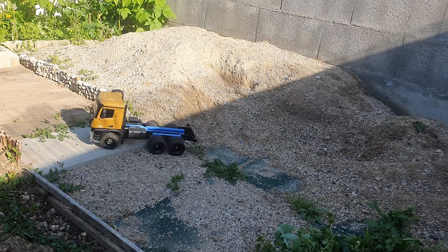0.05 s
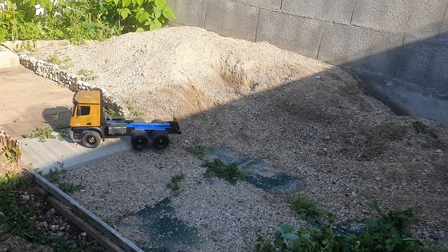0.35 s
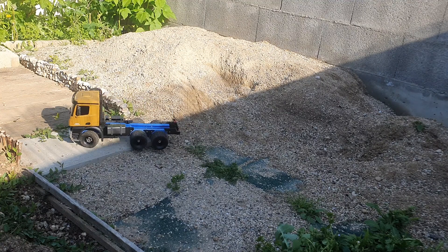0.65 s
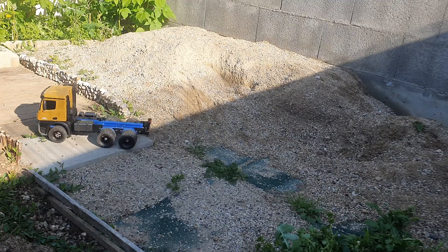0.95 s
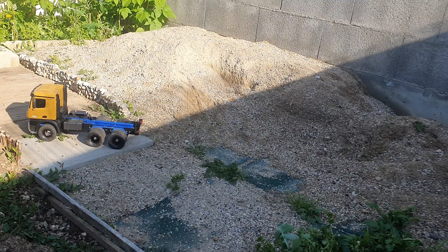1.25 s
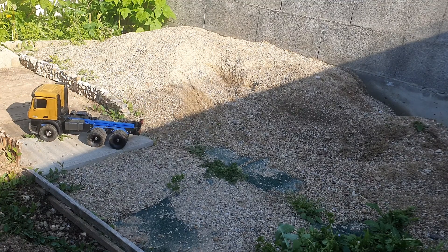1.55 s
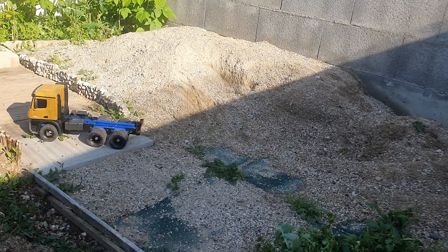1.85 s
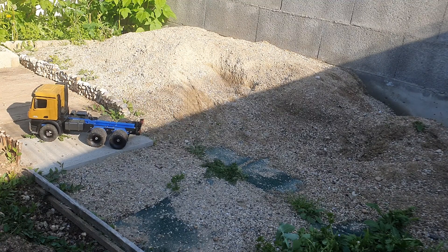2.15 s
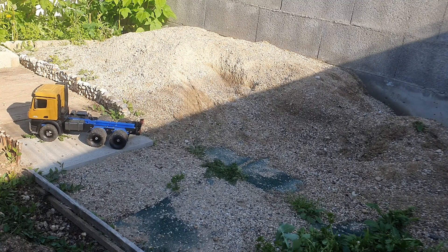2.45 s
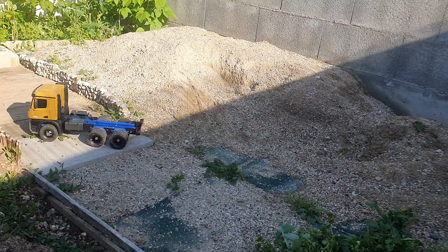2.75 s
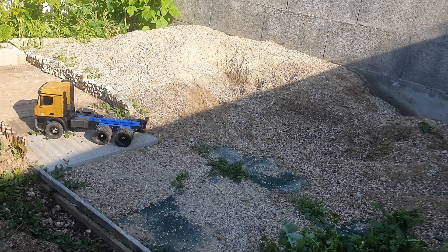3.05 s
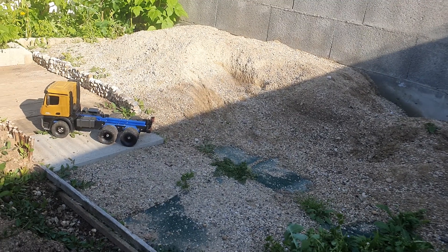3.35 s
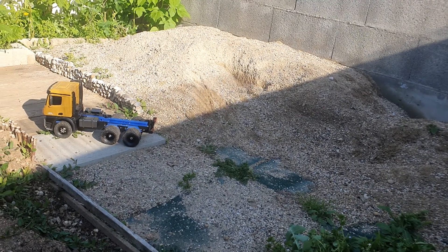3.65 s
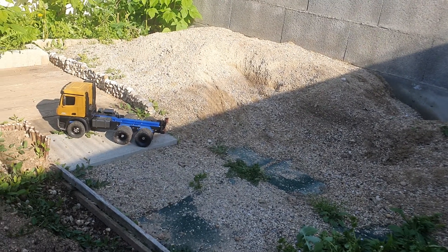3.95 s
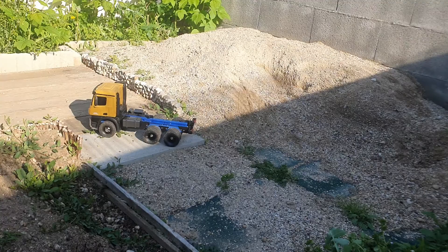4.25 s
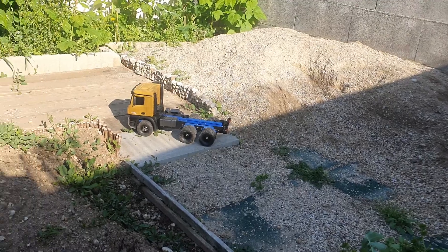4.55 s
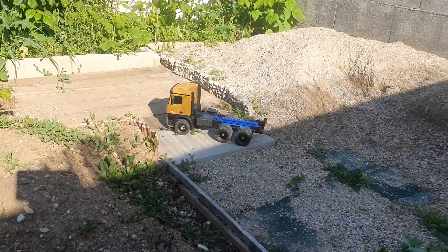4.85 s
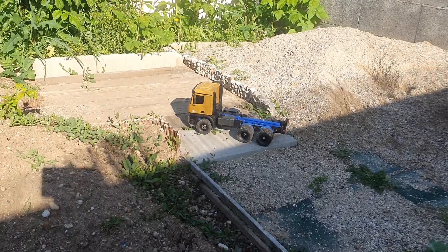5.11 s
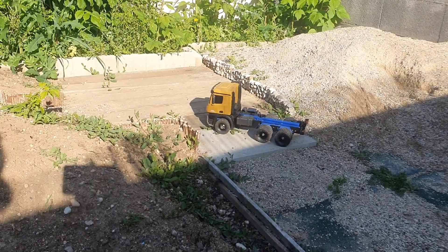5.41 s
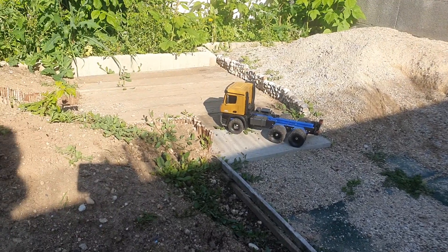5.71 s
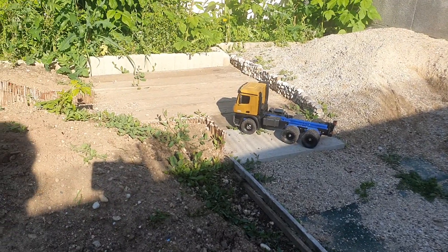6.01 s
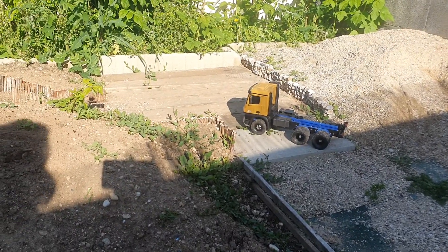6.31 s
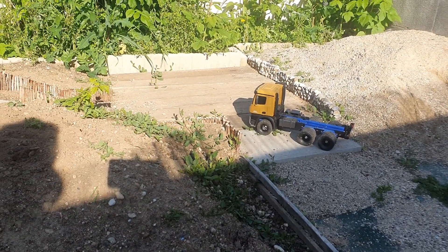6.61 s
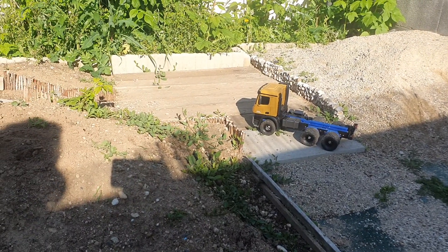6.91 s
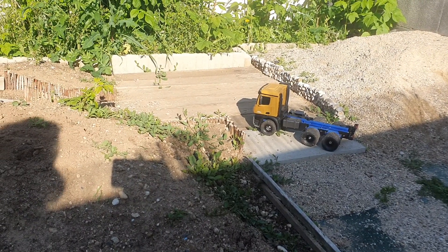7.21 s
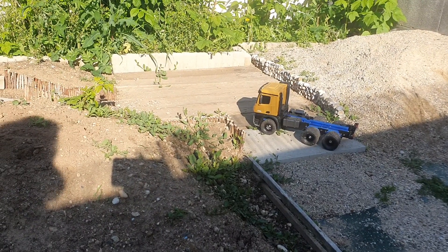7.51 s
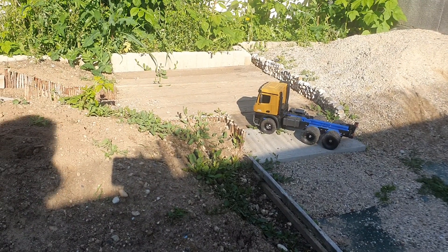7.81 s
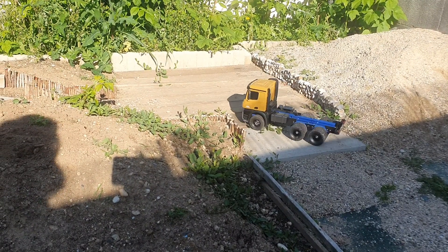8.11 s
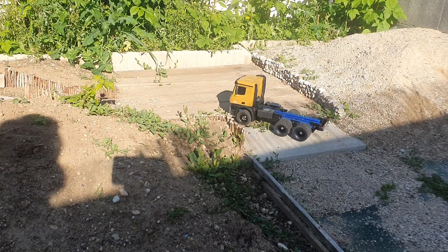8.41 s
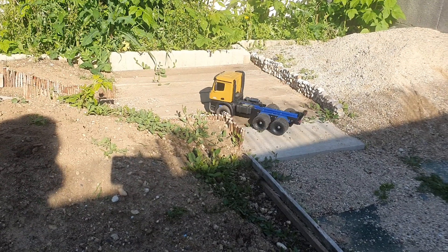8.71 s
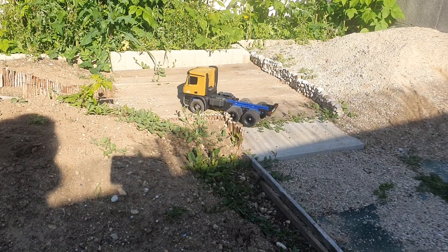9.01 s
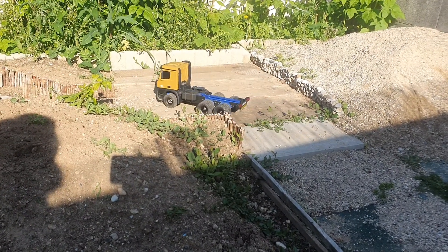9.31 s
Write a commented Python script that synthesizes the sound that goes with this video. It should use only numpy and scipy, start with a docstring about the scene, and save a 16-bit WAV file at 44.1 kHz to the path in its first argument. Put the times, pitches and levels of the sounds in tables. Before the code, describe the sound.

A small remote-controlled truck is already moving at the start, its electric motor and gears whining and its plastic body rattling, with a light knock and a scuff of grit as it slows. A second spurt rises at about 0.5 seconds and winds down by 1.2 seconds. The yard then goes quiet: small birds chirp and twitter some way off from about 1.6 to 7.7 seconds, clearest around 2 and 4 seconds. A light breeze rumbles on the microphone throughout, with soft bumps around 3 seconds. At about 7.8 seconds the truck starts again with a thin, high electronic whistle. Its rasping gear whine climbs, dips briefly, then rises to full speed by 9 seconds and keeps going. A knock and a crunch of grit come at about 9.4 seconds. The sound sits mostly to the left.

```python
"""A radio-controlled model truck whirs over gravel in two short spurts and stops on a path in a walled yard.
Small birds twitter some way off and a light breeze bumps the microphone; then the truck drives off again.
Its speed controller whistles by switching the motor current on and off very fast. Its gears whine
and rattle in a plastic body, following the speed of the motor, and grit scuffs under the tyres."""
import sys
import numpy as np
from scipy import signal
from scipy.fft import rfft, irfft, next_fast_len
from scipy.io import wavfile
from scipy.ndimage import uniform_filter1d

SR = 44100
rng = np.random.default_rng(int(sys.argv[2]) if len(sys.argv) > 2 else 0)


def digitize_waveform(pressure):
    """Quantize a signal to 16-bit integers and store it at the path in sys.argv[1].

    Rows of a 2-D input are taken as channels; values are limited to [-1, 1].
    """
    field = np.atleast_2d(pressure).T
    bounded = np.clip(field, -1, 1)
    quanta = np.round(bounded * 32767).astype(np.int16)
    wavfile.write(sys.argv[1], SR, quanta)


N = 417186
T = np.arange(N) / SR
HZ = np.fft.rfftfreq(N, 1 / SR)

# A "colour" says how strong the low and high parts of a sound are, compared with each other.
# colour of the open air's hiss: (frequency [Hz], level [dB])
AIR_COLOUR = [(88, -31.5), (150, -3), (231, -9), (457, -12), (514, -10), (1140, -15.5), (1560, -19),
              (2220, -29), (2810, -26.5), (3700, -33), (6640, -27.5), (7470, -42), (14000, -41.5),
              (15100, -40), (16000, -28)]
# slow swell of a far-off wash of noise: (time [s], relative level [dB])
WASH_LEVEL = [(1.4, -78), (2.3, -80), (3, -69), (3.7, -66), (3.9, -64.5), (4.1, -90), (5.5, -79),
              (6.5, -84), (7.2, -100)]
# colour of that wash: (frequency [Hz], level [dB])
WASH_COLOUR = [(150, -21), (400, -5), (800, 1), (1500, 1.5), (2000, -21), (4000, -33)]
# a faint high hiss that lingers after the spurts and returns briefly before the last drive:
# (time [s], level [dB])
HIGH_HISS_LEVEL = [(.35, -70), (.95, -65), (2, -68.5), (2.5, -74.5), (3, -79), (7.2, -101), (7.35, -65),
                   (7.6, -77.5)]
# colour of that high hiss: (frequency [Hz], level [dB])
HIGH_HISS_COLOUR = [(800, 5.5), (2200, -3.5), (3700, 9), (6500, 0), (7500, -8), (11000, -12.5),
                    (14000, -24)]
# gusts on the microphone: (middle [s], width [s], level [dB], left minus right [dB])
GUSTS = [(.05, 0.18, -50.5, -1), (0.77, 0.14, -52.5, 4), (1.32, 0.071, -55.5, 11), (1.696, .07, -49, 18.5),
         (2.102, 0.42, -54.5, 3.5), (2.88, 0.053, -45, -6), (3.065, 0.45, -51, 0), (3.24, 0.034, -41, 4),
         (3.584, 0.38, -55, 6.5), (4.358, 0.043, -48.5, 15), (6.82, 0.087, -50, 13.5),
         (7.04, 0.11, -49.5, 3.5), (7.708, 0.071, -52, 12), (7.986, 0.28, -55.5, 13),
         (8.262, 0.12, -47, -9), (9.08, 0.81, -48, -1.5), (9.295, .22, -44, 2)]
# colour of the breeze's rumble: (frequency [Hz], level [dB])
BREEZE_COLOUR = [(10, -69), (25, -7), (38, -4), (50, 3.5), (78, -1), (120, -11.5), (155, -14.5), (200, -31),
                 (300, -29), (600, -74.5)]

# moments when the distant flock gets louder: (middle [s], width [s], level [dB])
FLOCK_BOUTS = [(2.335, 0.12, -77.5), (3.25, 0.34, -80.5), (3.933, 0.21, -67.5), (4.527, 0.23, -78),
               (5.937, 1.5, -78.5), (6.86, 0.18, -79.5)]
# nearer birds: (time [s], length [s], start pitch [Hz], end pitch [Hz], level [dB], roughness [0-1])
CHIRPS = [(2.154, 0.067, 4970, 2860, -57, .4), (3.183, 0.088, 4370, 3420, -63, 0.75),
          (3.865, 0.041, 3600, 3210, -64, 0.22), (3.967, .055, 5090, 3840, -55.5, 0.84),
          (4.047, .02, 3545, 3680, -55, 0.01), (4.099, 0.019, 3645, 3430, -60, .05),
          (4.427, .038, 2006, 3120, -62, 0.52), (4.446, 0.0495, 3670, 3240, -60, 0.29),
          (6.265, 0.051, 4070, 3500, -66, .53), (7.494, 0.096, 3700, 3270, -66, 0.53),
          (7.652, 0.085, 3570, 3090, -65.5, 0.44)]
# one bird's thin, high pips: (time [s], level [dB])
PIPS = [(1.645, -70), (2.09, -74), (2.37, -72.5), (3.09, -72), (4.227, -75), (4.41, -72), (4.797, -74),
        (5.201, -71.5), (5.288, -77), (6.794, -69.5), (7.535, -72.5)]
# hoarse, falling calls farther off: (time [s], start pitch [Hz], level [dB])
HOARSE_CALLS = [(1.861, 3330, -72), (2.66, 4490, -67), (2.8, 4930, -72), (3.41, 4480, -72.5),
                (4.177, 4410, -68), (4.884, 5010, -72.5), (5.227, 3890, -69), (5.6, 3690, -69.5),
                (6.399, 4330, -71), (6.75, 4280, -73)]

# tyres scuffing grit: (time [s], length [s], level [dB])
SCUFFS = [(.213, .02, -49.5), (.245, .03, -50), (.415, .065, -51.5), (.925, .02, -48), (7.3, .06, -62),
          (7.39, .05, -66), (7.45, .05, -66), (8.088, .012, -49), (9.418, .025, -45)]
# colour of the grit: (frequency [Hz], level [dB])
GRIT_COLOUR = [(200, 3.5), (600, 7), (1500, -2), (2400, 10.5), (4000, 12), (7000, 4.5), (10000, -10),
               (15000, -9)]
# the truck's body knocking over bumps: (time [s], level [dB])
KNOCKS = [(.105, -53), (0.221, -61), (8.265, -69), (8.379, -66), (9.425, -47)]
# tones of the knocked body: (pitch [Hz], relative level [dB], time to fade by 60 dB [s])
KNOCK_TONES = [(373, -6, 0.15), (408, 9, 0.1), (510, 9, 0.22), (580, 23, 0.02), (673, 8, 0.16),
               (1840, 14, .04)]
# speed of the motor shaft, one list for each drive: (time [s], speed [turns/s])
SHAFT_SPEED = [
    [(0, 75.3), (.16, 75), (.25, 48), (.32, 9)],
    [(.49, 2), (.54, 20), (.6, 35), (.67, 67), (.82, 83), (.92, 68), (1.03, 33), (1.21, 3)],
    [(7.75, 3), (7.9, 21), (7.99, 39), (8.16, 49), (8.34, 38), (8.6, 61), (8.71, 79), (8.89, 82),
     (8.95, 88), (9.01, 83), (9.22, 92.5), (9.3, 86), (9.46, 87)],
]
# the three drives, with base levels for their sounds: (throttle on [s], throttle off [s], gears [dB],
# body rattle [dB], whistle [dB], whine relative to gears [dB], motor can relative to gears [dB])
DRIVES = [(-.05, 0.092, -40, -43.5, -60, -6, -8), (0.5, .92, -40, -41, -56.5, -10, -13),
          (7.764, 9.6, -42.5, -42.5, -51.5, -7, -5.5)]
# tones from 6 switches of the motor's contacts and 13 gear teeth a turn: (pitch [cycles per turn])
WHINE_MULTIPLES = [6, 12, 18, 24, 26, 39, 48, 52, 65, 78]
# strength of each of those tones: (relative level [dB])
WHINE_LEVELS = [-1, -7, -2, -10, -7, 0, -7, -.5, -7, -3.5]
# how well the housing lets those tones out: (frequency [Hz], gain [dB])
HOUSING_GAIN = [(250, -18), (440, -2), (550, 1), (720, -5), (950, -7), (1130, 2), (1370, 3), (1480, -3),
                (1550, -12), (1650, -14), (1800, -2), (2000, -9), (2280, -1), (2600, -7), (3000, -1),
                (3300, -2), (3600, 1), (3900, -1), (4270, 5), (4600, -4), (4900, -12), (6200, -5),
                (8000, -12)]
# colour of the gearbox: (frequency [Hz], level [dB])
GEARBOX_COLOUR = [(250, -25), (700, -11.5), (1100, -1.5), (1600, -0.5), (2000, -2), (3300, 4.5),
                  (4400, 1.5), (5200, 2.5), (6500, 3), (8200, -4.5), (10200, -1.5), (12000, -10.5),
                  (16000, -13)]
# pitches at which the gearbox rings: (pitch [Hz], width [Hz], boost [dB])
GEARBOX_RINGS = [(1133, 29, 14.4), (1457, 110, 9.6), (1748, 12.5, 16.6), (2360, 16, 11.3), (3036, 19, 11.8),
                 (4540, 84, 1.4), (6180, 150, 5.3)]
# colour of the motor's metal shell, its "can": (frequency [Hz], level [dB])
CAN_COLOUR = [(3000, -24), (3500, 11), (3720, 9), (3900, 28), (4060, -3), (4350, -11), (5000, -67)]
# colour of the rattling body: (frequency [Hz], level [dB])
BODY_COLOUR = [(60, -28), (170, -12), (260, -16), (350, -7.5), (440, 1), (500, -13.5), (570, 2.5),
               (720, -0.5), (860, -10), (1200, -15.5), (3000, -28.5)]

# how much quieter the microphone's shaded right side is: (frequency [Hz], drop [dB])
RIGHT_SHADE = [(60, 2.5), (200, 3), (380, 5.5), (700, 8), (1300, 11), (4400, 11.3), (8000, 12.3),
               (15000, 15)]
# how alike left and right are: (frequency [Hz], likeness [0-1])
LIKENESS = [(60, 0.57), (130, 1), (290, 0.71), (640, 0.57), (1400, 0.14), (3100, 0.32), (7000, 0.055)]

CRUISE_SPEED = 80  # turns of the shaft per second
RASP_DB_PER_DOUBLING, WHINE_DB_PER_DOUBLING, RATTLE_DB_PER_DOUBLING = 7, 3, 6  # as the speed doubles


def amp(db):
    """Turns decibels into a number to multiply by."""
    return 10 ** (np.asarray(db) / 20)


def unit(x):
    """Scales a signal to an average strength (rms) of one."""
    return x / np.sqrt(np.mean(x ** 2) + 1e-20)


def curve(rows):
    """Joins (time, value) points with straight lines, one value for every sample."""
    return np.interp(T, *np.transpose(rows))


def shape(points):
    """Joins (frequency, value) points, one value for every frequency in HZ."""
    hz, value = np.transpose(points)
    return np.interp(np.log(HZ + 1), np.log(hz + 1), value)


def colour(x, db):
    """Turns each frequency up or down, then scales the result to strength one."""
    return unit(irfft(rfft(x) * amp(db), N))


def wander(hz, size=N, stride=16):
    """A smooth random wobble of strength one, with changes up to about the given rate."""
    steps = next_fast_len(size // stride + 2)
    f = np.fft.rfftfreq(steps, stride / SR)
    slow = unit(irfft(rfft(rng.standard_normal(steps)) / (1 + (f / hz) ** 4), steps))
    return np.interp(np.arange(size), np.arange(steps) * stride, slow)


def swell(middle, width):
    """A bell-shaped rise and fall in time."""
    return np.exp(-np.minimum((2 * (T - middle) / width) ** 2 / 2, 50))


def add(mix, s, sound):
    """Mixes a sound in, starting at s seconds."""
    part = mix[max(round(s * SR), 0):][:len(sound)]
    part += sound[:len(part)]


def pair(x):
    """Makes two unrelated channels alike in the bass."""
    a, b = rfft(x)
    same = shape(LIKENESS)
    return irfft(np.array([a, same * a + np.sqrt(1 - same ** 2) * b]), N)


def yard(x, fade_s, echo_db):
    """Adds echoes from ground and walls, different left and right, that fall 60 dB in fade_s."""
    t = np.arange(SR // 2) / SR
    echoes = rng.standard_normal((2, len(t))) * (rng.random((2, len(t))) < 3000 / SR)
    echoes *= amp(-60 * t / fade_s)
    echoes *= amp(echo_db) / np.linalg.norm(echoes, axis=1, keepdims=True)
    echoes[:, 0] += 1  # the direct sound
    return signal.fftconvolve(x[None], echoes, axes=1)[:, :N] / np.sqrt(1 + amp(echo_db) ** 2)


def air(hiss_db=-68, wash_db=-3, left_lead_s=.00039, direct_share=.54):
    """Still air hisses, a faint high hiss comes and goes, and a far-off wash arrives from the left."""
    hiss = amp(hiss_db + .5 * wander(.59)) * colour(rng.standard_normal((2, N)), shape(AIR_COLOUR))
    left, scatter = rng.standard_normal((2, N))
    delayed = np.roll(left, round(left_lead_s * SR))
    right = direct_share * delayed + np.sqrt(1 - direct_share ** 2) * scatter
    wash = amp(curve(WASH_LEVEL) + wash_db) * colour(np.array([left, right]), shape(WASH_COLOUR))
    high_hiss_gain = amp(curve(HIGH_HISS_LEVEL) + wander(9.7))
    return hiss + wash + high_hiss_gain * colour(rng.standard_normal((2, N)), shape(HIGH_HISS_COLOUR))


def breeze(calm_db=-58.5, waver_db=3):
    """Light air rumbles on the microphone; most gusts hit one side harder than the other."""
    power = amp(calm_db + waver_db * wander(6.4)) ** 2
    for s, width, db, lean_db in GUSTS:
        sides = amp([[db + lean_db / 2], [db - lean_db / 2]])
        power = power + (sides * swell(s, width)) ** 2
    return np.sqrt(power) * colour(pair(rng.standard_normal((2, N))), shape(BREEZE_COLOUR))


def flock(count=1100, from_s=1.8, to_s=7.3, base_db=-83):
    """Short falling chirps from distant birds arrive mostly as echo from the walls."""
    twitter = np.zeros(N)
    glide = np.linspace(1, .82, SR // 30)
    for when, a, b in rng.random((count, 3)):
        hz = (2900 + 1400 * (a + b)) * glide
        chirp = np.hanning(len(hz)) * np.sin(2 * np.pi * np.cumsum(hz) / SR)
        add(twitter, from_s + when * (to_s - from_s), chirp)
    level = amp(base_db) + sum(amp(db) * swell(s, width) ** 2 for s, width, db in FLOCK_BOUTS)
    return yard(level * unit(twitter), fade_s=.25, echo_db=12)


def bird_note(length_s, start_hz, end_hz, db, rough, wobble_hz=550):
    """A gliding whistle; a fast wobble in its pitch makes it hoarse."""
    n = int(length_s * SR)
    hz = np.linspace(start_hz, end_hz, n) + rough * wobble_hz * wander(407, size=16384)[:n]
    return amp(db) * signal.windows.tukey(n, .6) * unit(np.sin(2 * np.pi * np.cumsum(hz) / SR))


def birds(run_notes=10, run_from_s=5.66, run_to_s=6.345, run_db=-67, accent_db=4.5):
    """Chirps, pips, hoarse calls and a quick run of rising notes, all echoed by the walls."""
    song = np.zeros(N)
    for s, *chirp in CHIRPS:
        add(song, s, bird_note(*chirp))
    for s, db in PIPS:
        add(song, s, bird_note(length_s=.05, start_hz=6720, end_hz=5770, db=db, rough=.22))
    for s, hz, db in HOARSE_CALLS:
        add(song, s, bird_note(length_s=.125, start_hz=hz, end_hz=.81 * hz, db=db, rough=.68))
    for k, s in enumerate(np.linspace(run_from_s, run_to_s, run_notes)):
        pitch, late_s = 1 + .08 * rng.standard_normal(), rng.uniform(-.0081, .012)
        db = run_db + accent_db * (k == run_notes - 1)  # the last note is louder
        add(song, s + late_s, bird_note(.028, pitch * 4550, pitch * 5480, db, rough=.625))
    return yard(song, fade_s=.43, echo_db=1.5)


def grit_and_bumps(grains_per_s=1400):
    """Grit crackles under the tyres, and bumps make the truck's body ring briefly."""
    pressure, knocks = np.zeros(N), np.zeros(N)
    for s, length, db in SCUFFS:
        add(pressure, s, amp(db) * signal.windows.hann(int(length * SR)))
    grains = rng.standard_normal(N) * (rng.random(N) < grains_per_s / SR)
    t = np.arange(SR // 5) / SR
    ring = unit(sum(amp(db - 60 * t / fade) * np.sin(2 * np.pi * hz * t) for hz, db, fade in KNOCK_TONES))
    for s, db in KNOCKS:
        add(knocks, s, amp(db) * ring)
    return yard(pressure * colour(grains, shape(GRIT_COLOUR)) + knocks, fade_s=.24, echo_db=5.5)


def throttle(grip_s=.0042, release_s=.098):
    """How hard the motor pulls (0-1), and the levels of the drive under way."""
    on, off, *levels = np.transpose(DRIVES)
    drive = np.maximum(np.searchsorted(on, T, side="right") - 1, 0)
    pull = np.clip((T - on[drive]) / grip_s, 0, 1) * np.clip(1 - (T - off[drive]) / release_s, 0, 1)
    return pull, [db[drive] for db in levels]


def strain(speed, lag_s=.067, full_effort=100):
    """How hard the motor works to speed up (0-1); full_effort is turns/s gained each second."""
    keep = np.exp(-1 / (lag_s * SR))
    gaining = np.maximum(np.gradient(speed) * SR, 0)
    smoothed = signal.lfilter([1 - keep], [1, -keep], gaining)
    return np.clip(smoothed / full_effort, 0, 1)


def tooth_clicks(turns, slide, clicks_per_turn=18, spread_db=3):
    """Gear teeth strike one by one with uneven force, and hiss as they slide in between."""
    strike = np.diff(np.floor(clicks_per_turn * turns), prepend=0) > 0
    force = strike * amp(spread_db * np.clip(rng.standard_normal(N), -2, 2))
    force /= np.sqrt(abs(uniform_filter1d(force ** 2, size=3000)) + 1e-4)  # evens out the loudness
    return force * rng.choice([-1, 1], (2, N)) + slide * rng.standard_normal((2, N))


def tooth_buzz(turns, count=330):
    """The same uneven tooth faces come round every turn, buzzing at multiples of the shaft speed."""
    harmonics = rng.standard_normal((2, count)) * np.exp(2j * np.pi * rng.random((2, count)))
    faces = irfft(harmonics, 4096)
    angle = np.linspace(0, 1, faces.shape[1])
    a, b = (np.interp(turns % 1, angle, face) for face in faces)
    roll = 1.5 * wander(7)  # other teeth meet as the wheels roll
    return unit(np.array([a * np.cos(roll) + b * np.sin(roll), b * np.cos(roll) - a * np.sin(roll)]))


def body_rattle(turns, speed, base_db, boost_db=3, start_speed=18, settle_db_per_s=147):
    """The plastic body shakes harder with speed, and dies down at its own pace."""
    moving = 1 / (1 + (start_speed / speed) ** 10)
    db = base_db + boost_db + RATTLE_DB_PER_DOUBLING * np.log2(speed / CRUISE_SPEED)
    db += 20 * np.log10(moving)
    db = np.maximum.accumulate(db + settle_db_per_s * T) - settle_db_per_s * T  # limits how fast it falls
    rattle = colour(pair(tooth_clicks(turns, slide=.69) + tooth_buzz(turns)), shape(BODY_COLOUR))
    return amp(db + 1.5 * wander(26)) * rattle


def can_ring(teeth, speed, ring_hz=3900, reach_hz=170, idle_db=-11, multiples=(52, 78, 130)):
    """The motor's can rings most when a gear tone sweeps through the can's own pitch."""
    match = sum(1 / (1 + ((k * speed - ring_hz) / reach_hz) ** 2) for k in multiples)
    return (amp(idle_db) + match) * colour(teeth, shape(CAN_COLOUR))


def controller_whistle(turns, speed, switch_hz=1436, full_speed_db=-12, flutter_db=.5):
    """Chopped current whistles; the motor's contacts dent it, adding side tones that part with speed."""
    chop = 2 * np.pi * switch_hz * T
    contacts = 2 * np.pi * WHINE_MULTIPLES[0] * turns
    sides = .9 * np.cos(chop - contacts) + .17 * np.cos(chop + contacts)
    sides *= np.clip(speed / 20, 0, 1) * np.clip((70 - speed) / 16, 0, 1)  # strongest at middle speeds
    centre = amp(-.13 * speed) * np.cos(chop)
    overtones = (amp(-14) * np.cos(2 * chop) + amp(-21) * np.cos(3 * chop)) * (1 + .5 * np.cos(contacts))
    wide_open = np.clip((speed - 68) / 18, 0, 1)
    return amp(full_speed_db * wide_open + flutter_db * wander(12)) * (centre + sides + overtones)


def gear_whine(turns, speed, throb_depth=.19):
    """The motor's contacts and the meshing teeth make tones that sing out at speed."""
    angle = turns + .0032 * wander(100)  # slack between the teeth roughens the tones
    tones = sum(amp(db + 4 * wander(22)) * np.cos(2 * np.pi * (k * angle + rng.random()))
                for k, db in zip(WHINE_MULTIPLES, WHINE_LEVELS))
    tones *= 1 + throb_depth * np.cos(2 * np.pi * turns)  # an off-centre gear throbs once a turn
    tones *= amp(WHINE_DB_PER_DOUBLING * np.log2(speed / CRUISE_SPEED))  # on top of the gears' own rise
    return irfft(rfft(tones) * amp(shape(HOUSING_GAIN)), N)


def gear_rasp(teeth, speed, trim_db=-3):
    """The teeth set the gearbox ringing; slow teeth strike more softly and sound duller."""
    rings_db = sum(db / (1 + (2 * (HZ - hz) / width) ** 2) for hz, width, db in GEARBOX_RINGS)
    box_db = shape(GEARBOX_COLOUR) + rings_db
    bright, dull = colour(teeth, box_db), colour(teeth, box_db - HZ / 1200)
    hardness = np.clip(speed / 70, 0, 1) ** 2
    return amp(trim_db + 1.3 * wander(22)) * (hardness * bright + (1 - hardness) * dull)


def truck(coast_db=-8.5, strain_db=3):
    """One motor shaft drives rasp, ring, rattle, whistle and whine; coasting gears are quieter."""
    steady_speed = curve(np.vstack(SHAFT_SPEED))
    speed = steady_speed * (1 + .012 * wander(24))
    turns = np.cumsum(speed) / SR
    pull, (gear_db, body_db, whistle_db, whine_db, can_db) = throttle()
    rolling = np.clip(speed / 12 - .25, 0, 1)
    speed_db = RASP_DB_PER_DOUBLING * np.log2(speed / CRUISE_SPEED)
    gear_gain = rolling * amp(gear_db + speed_db + coast_db * (1 - pull))
    teeth = pair(tooth_clicks(turns, slide=.5) + 1.5 * tooth_buzz(turns))
    gears = gear_gain * (gear_rasp(teeth, speed) + amp(can_db) * can_ring(teeth, speed))
    rattle = body_rattle(turns, speed, body_db)
    whistle = pull * amp(whistle_db) * controller_whistle(turns, speed)
    whine = gear_gain * amp(whine_db + strain_db * strain(steady_speed)) * gear_whine(turns, speed)
    return gears + rattle + yard(whistle + whine, fade_s=.14, echo_db=-5)


def scene():
    """Adds up all the sounds in the yard."""
    return truck() + grit_and_bumps() + birds() + flock() + air() + breeze()


def record(dry, top_hz=15850):
    """The microphone's right side is shaded, more so in the treble; the highest treble is cut off."""
    shade = amp(-shape(RIGHT_SHADE))
    left = 2 / np.sqrt(1 + shade ** 2 + 2 * shape(LIKENESS) * shade)  # keeps the level of the middle
    heard = irfft(rfft(dry) * np.array([left, left * shade]), N)
    treble_cut = signal.firwin(511, top_hz, window=("kaiser", 9), fs=SR)
    return signal.oaconvolve(heard, treble_cut[None], "same")


dry = scene()
out = record(dry)
digitize_waveform(out)
```